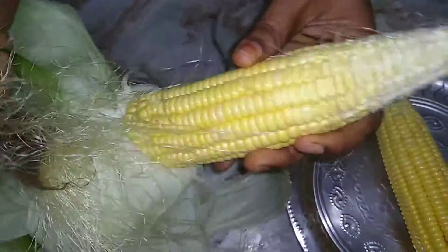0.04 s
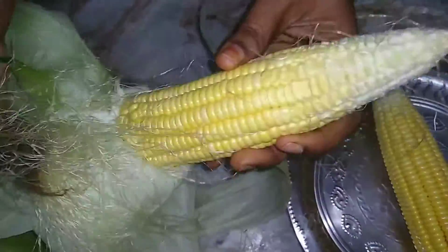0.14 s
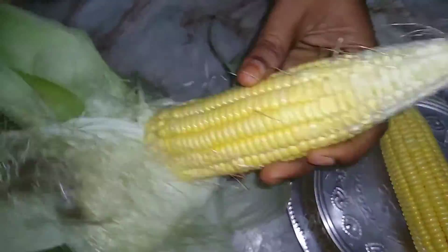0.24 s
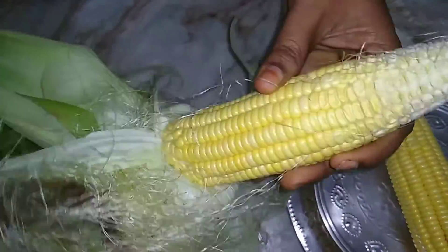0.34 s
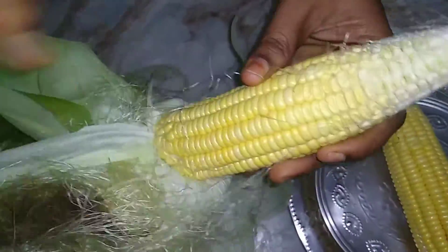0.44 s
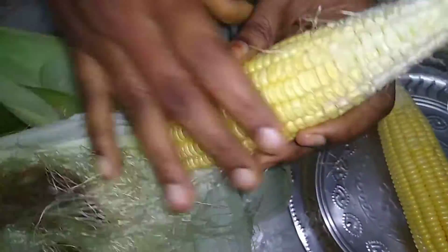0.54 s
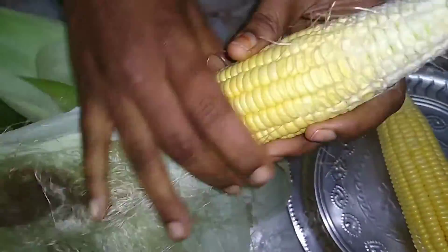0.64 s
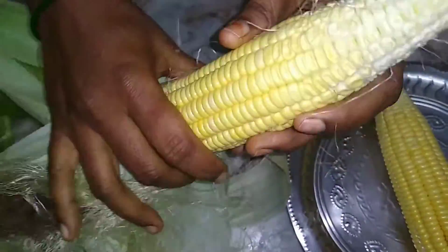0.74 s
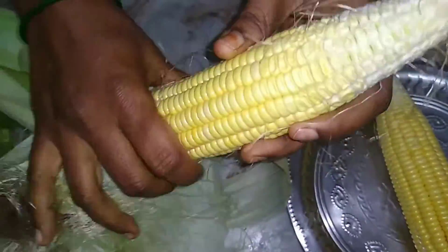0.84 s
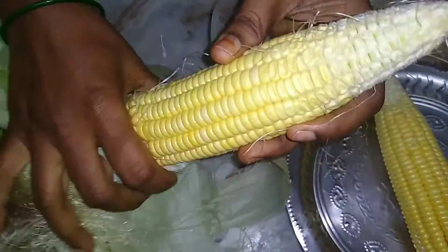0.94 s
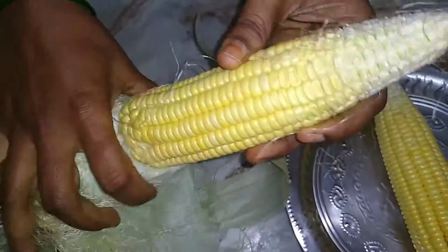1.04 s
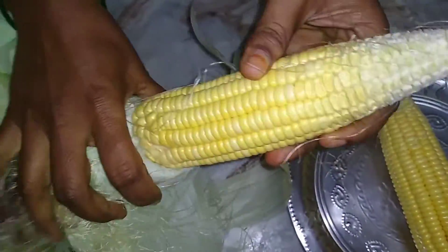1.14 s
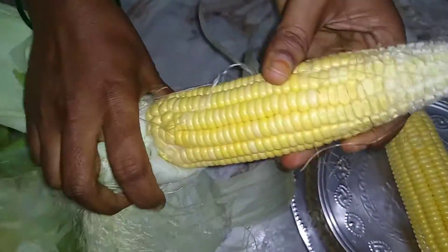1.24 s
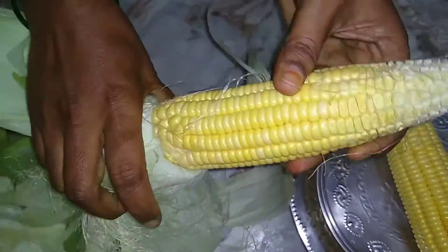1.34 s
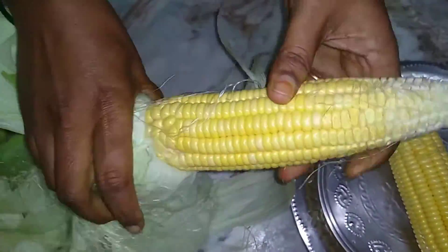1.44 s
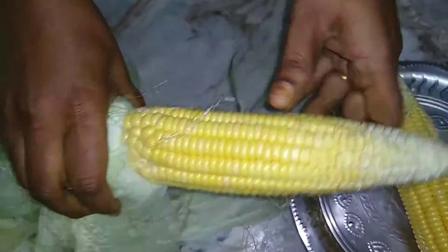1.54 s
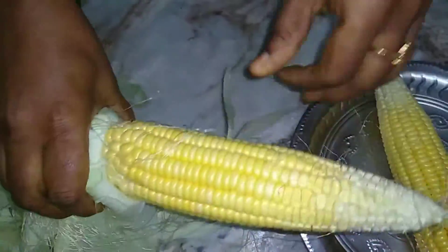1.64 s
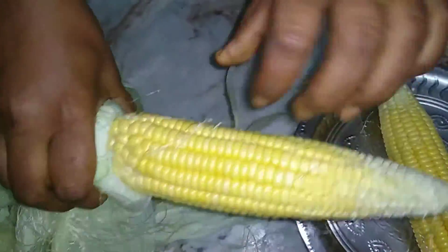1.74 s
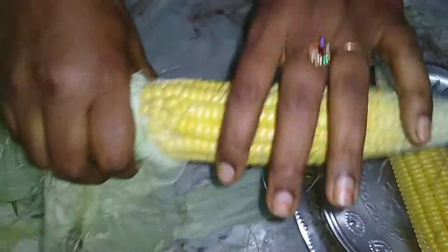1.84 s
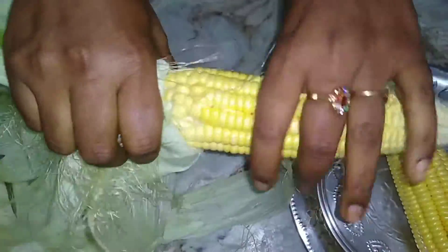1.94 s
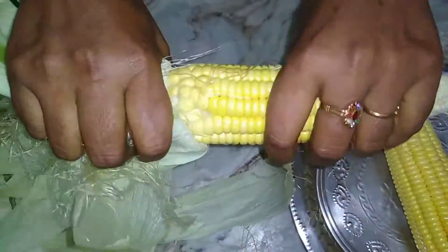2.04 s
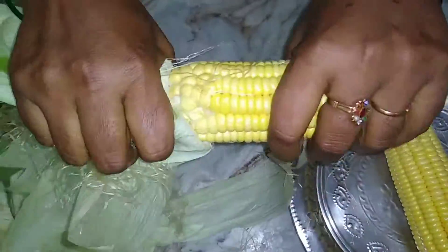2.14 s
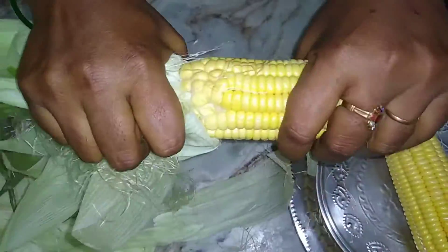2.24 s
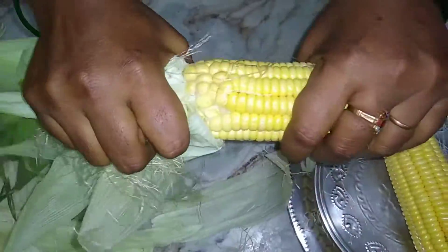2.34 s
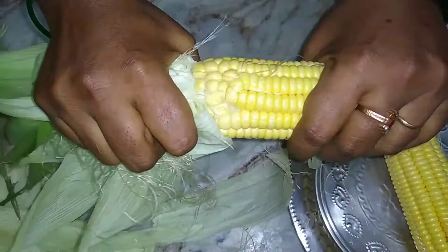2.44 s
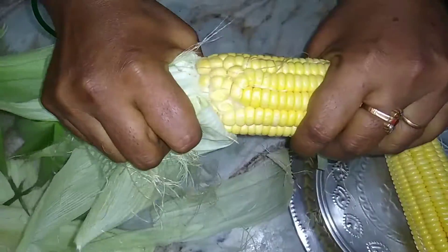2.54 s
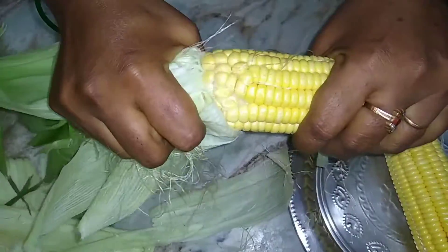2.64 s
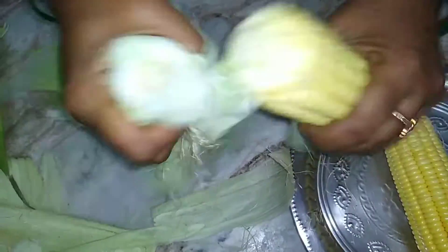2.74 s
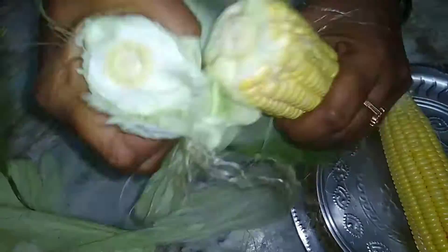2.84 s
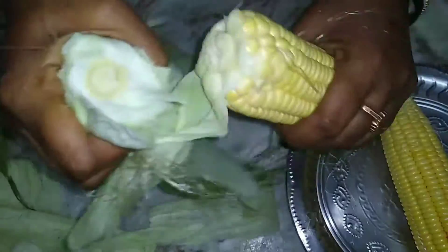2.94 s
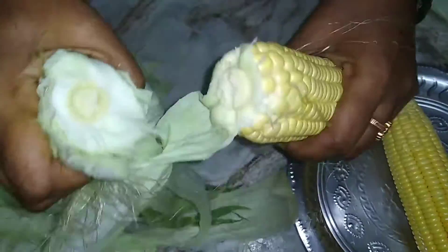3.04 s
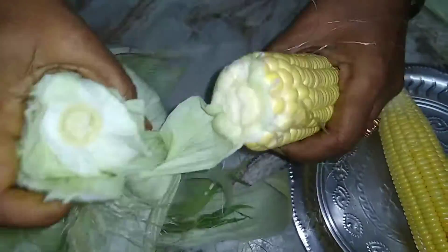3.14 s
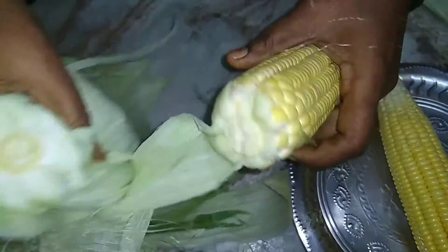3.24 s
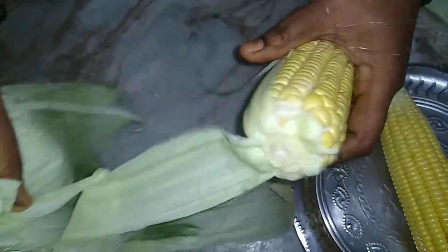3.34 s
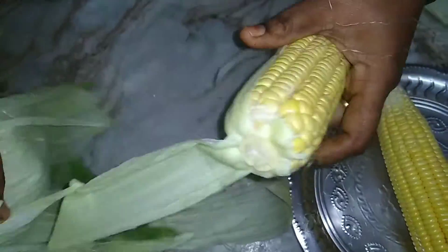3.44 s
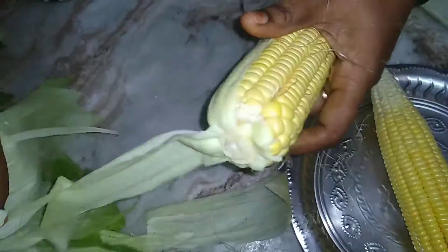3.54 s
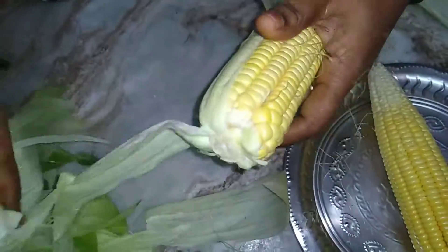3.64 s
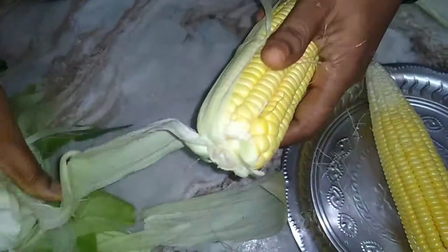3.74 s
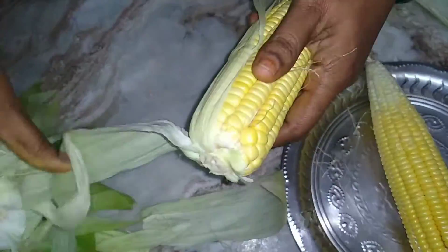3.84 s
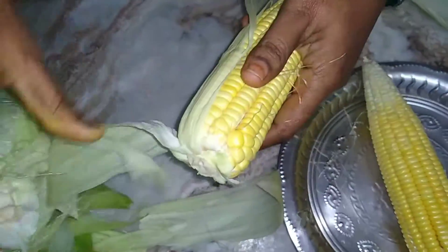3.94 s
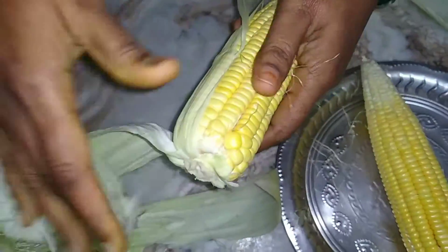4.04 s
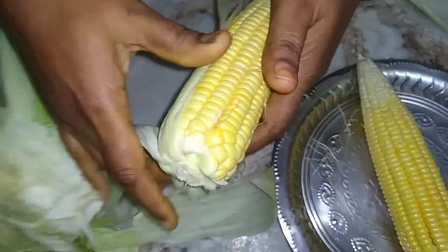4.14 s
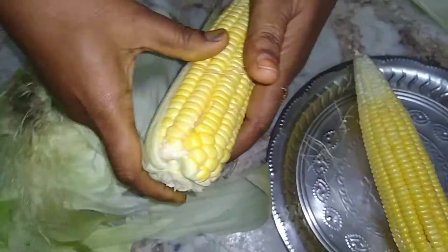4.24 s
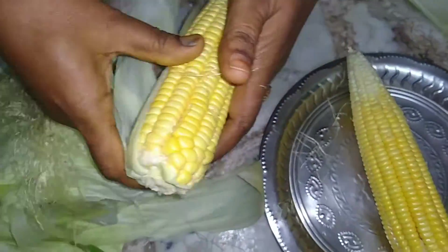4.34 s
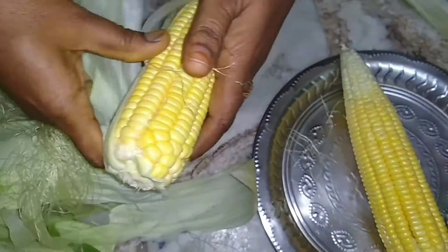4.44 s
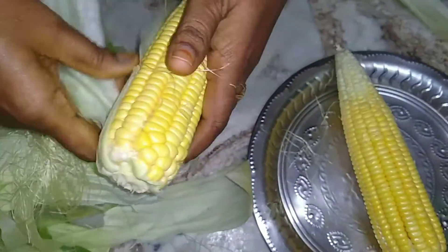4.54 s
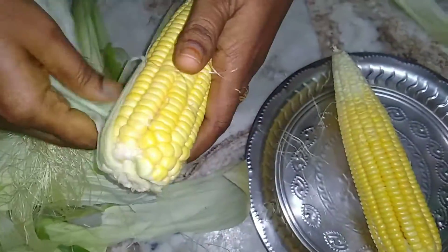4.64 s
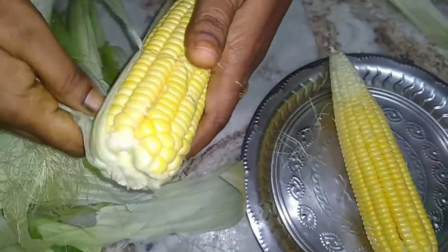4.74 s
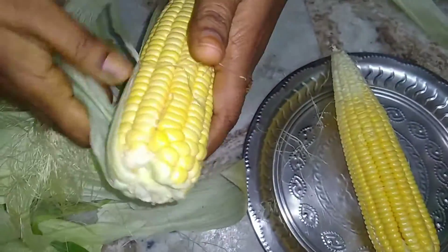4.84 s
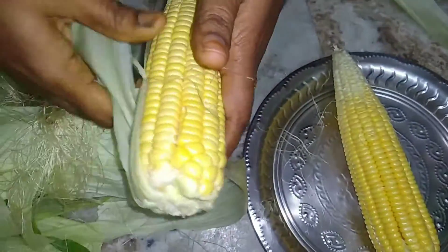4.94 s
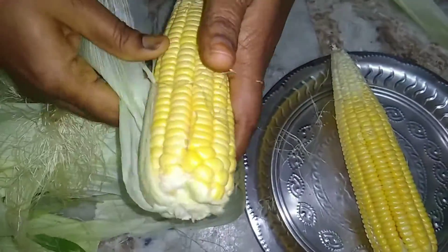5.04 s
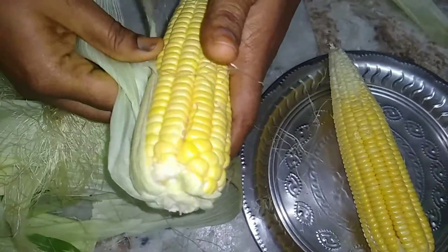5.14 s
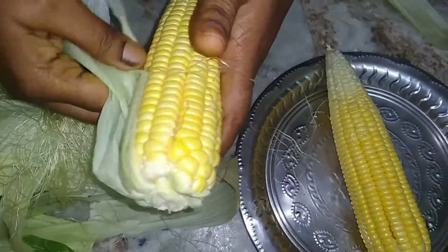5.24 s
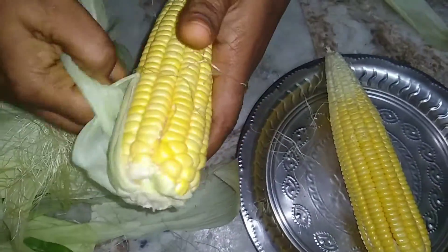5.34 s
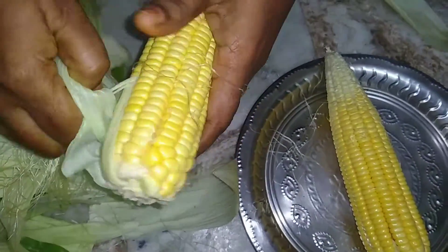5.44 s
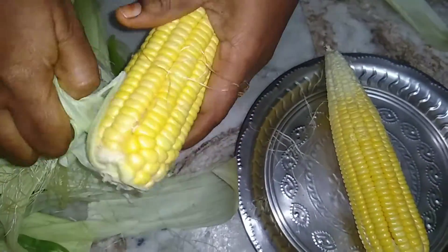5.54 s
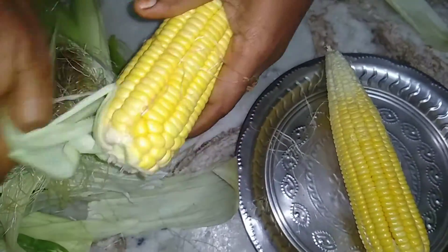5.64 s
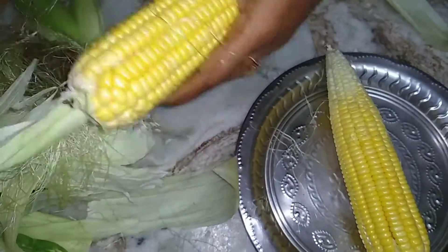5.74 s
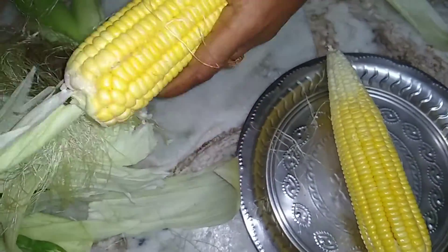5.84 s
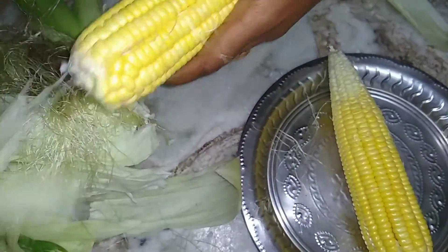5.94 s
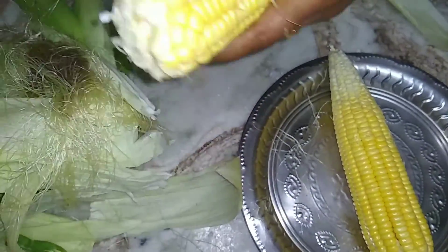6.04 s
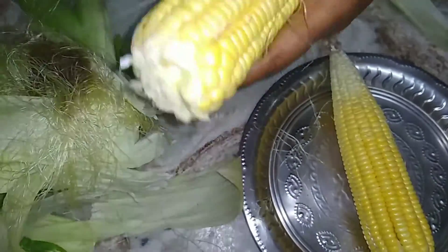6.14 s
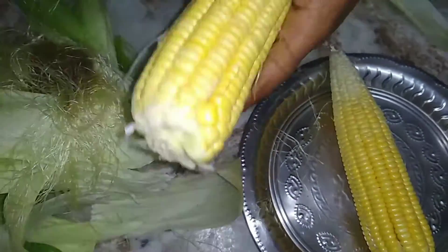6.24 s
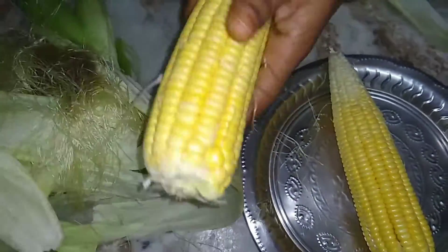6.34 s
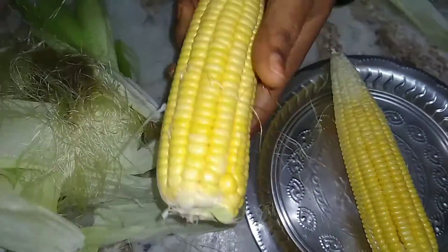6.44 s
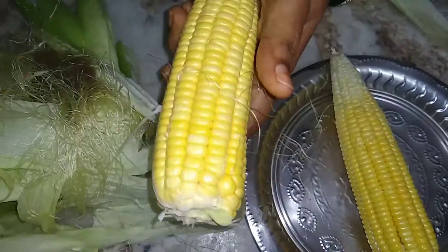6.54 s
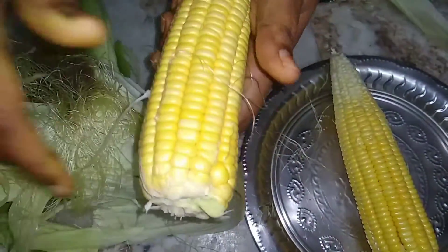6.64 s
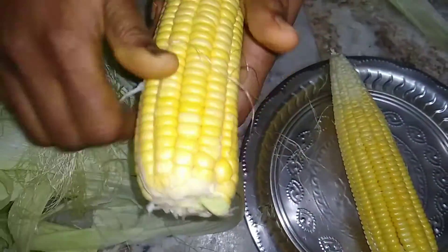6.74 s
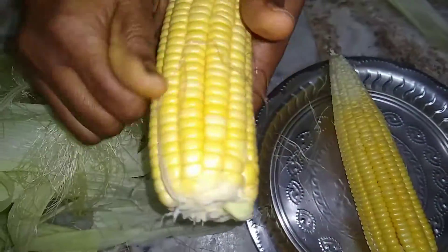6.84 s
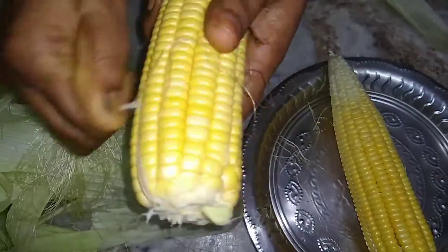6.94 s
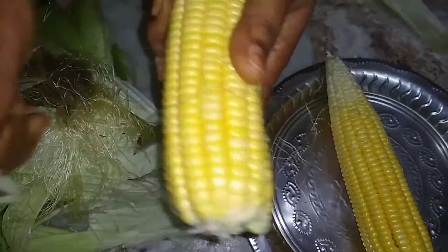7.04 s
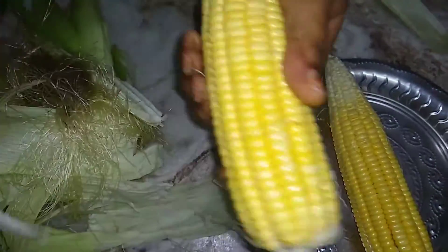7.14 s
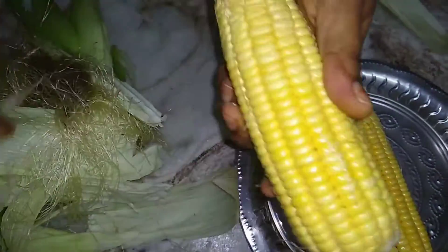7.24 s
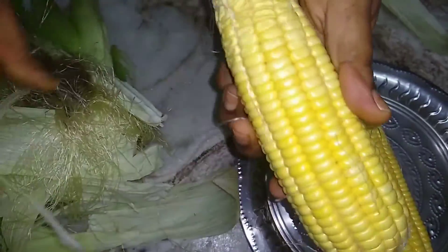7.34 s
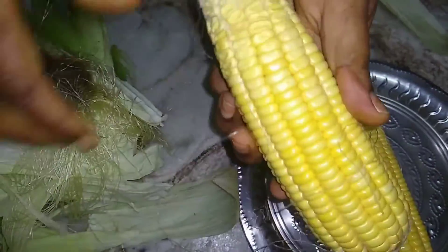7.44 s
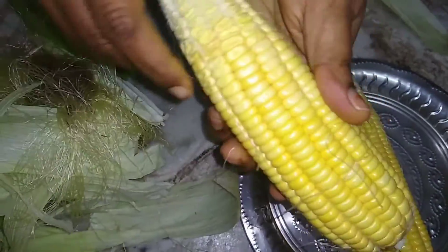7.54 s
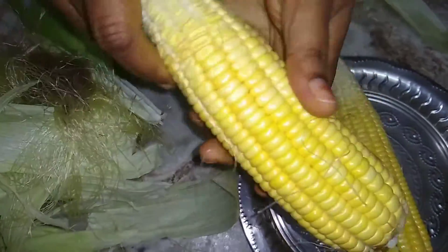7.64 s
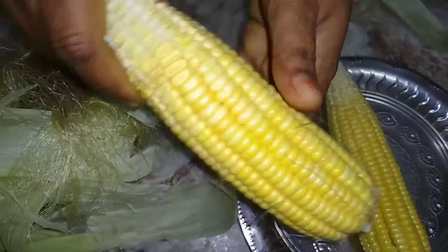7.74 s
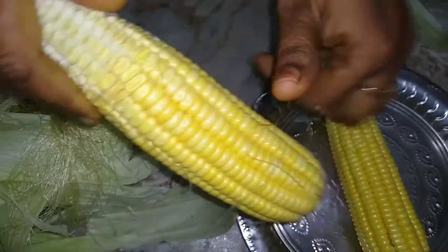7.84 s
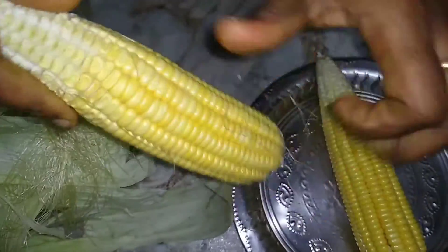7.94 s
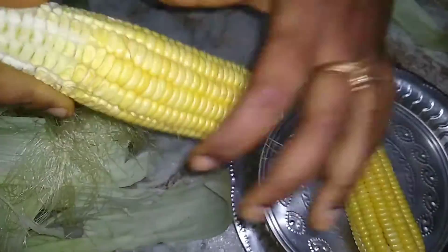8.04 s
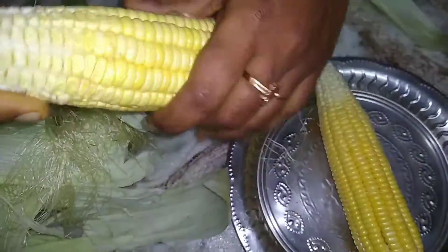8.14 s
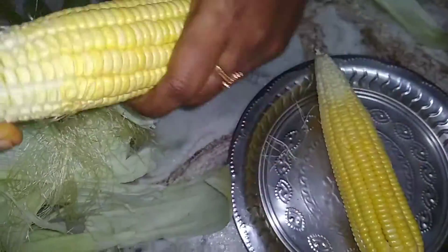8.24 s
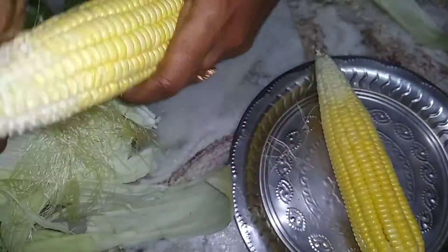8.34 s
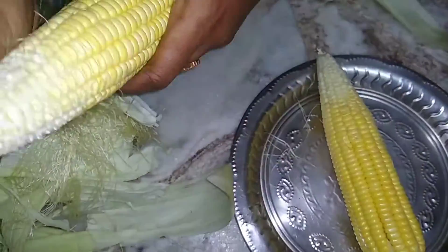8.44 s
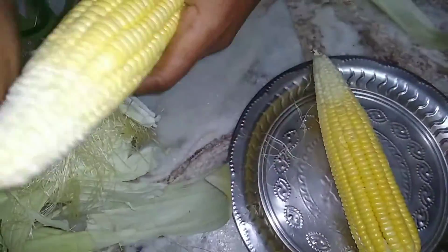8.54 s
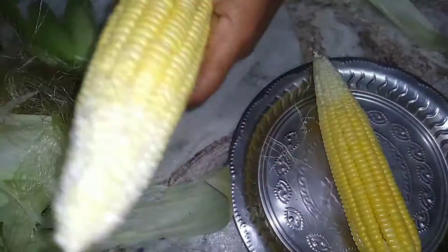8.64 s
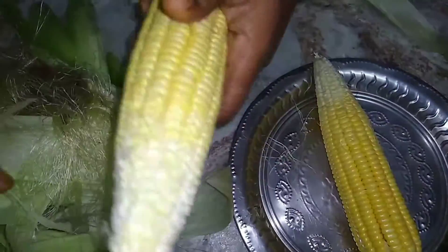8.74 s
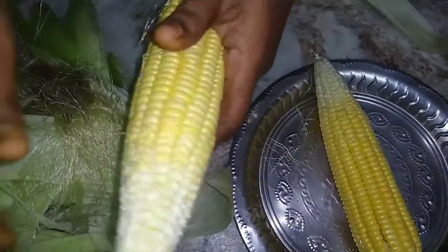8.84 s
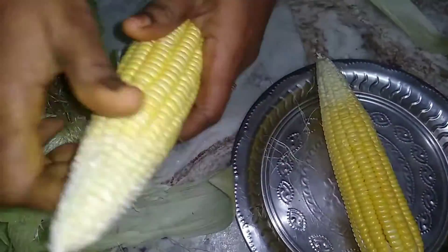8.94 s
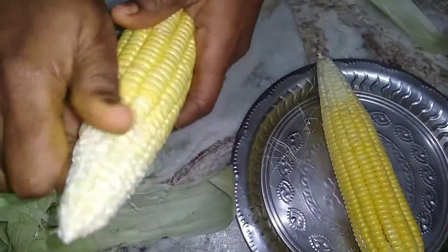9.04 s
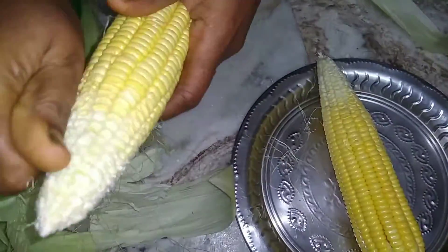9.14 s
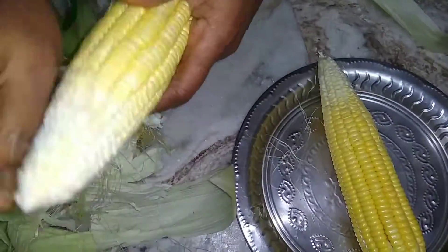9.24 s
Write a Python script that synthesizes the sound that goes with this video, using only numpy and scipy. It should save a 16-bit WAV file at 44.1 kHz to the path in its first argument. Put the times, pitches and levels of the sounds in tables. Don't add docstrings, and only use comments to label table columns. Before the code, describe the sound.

Crisp corn leaves rustle, snap and tear in irregular bursts, fingertips squeak on kernels, and a distant engine idles behind quiet room hush.

```python
import sys
import numpy as np
from scipy import signal
from scipy.fft import rfft, irfft, next_fast_len
from scipy.io import wavfile
from scipy.ndimage import uniform_filter1d

SR = 44100
rng = np.random.default_rng(int(sys.argv[2]) if len(sys.argv) > 2 else 0)


def invert_db(level):
    return 10 ** (np.asarray(level, dtype=float) / 20)


def inscribe(sig):
    pcm = np.round(np.clip(np.atleast_2d(sig).T, -1, 1) * 32767)
    wavfile.write(sys.argv[1], SR, pcm.astype(np.int16))


N = 409248


def in_time(rows):
    s, *columns = np.transpose(rows)
    return [np.interp(np.arange(N) / SR, s, column) for column in columns]


def at_hz(points, hz):
    f, *columns = np.transpose(points)
    return [np.interp(np.log(hz + 1), np.log(f), column) for column in columns]


def rms_one(x):
    return x / np.sqrt(np.mean(x ** 2) + 1e-20)


def band(x, low_hz, high_hz):
    return signal.sosfilt(signal.butter(2, [low_hz, high_hz], "band", fs=SR, output="sos"), x)


def resonance(x, hz, width_hz):
    r = np.exp(-np.pi * width_hz / SR)
    zeros = np.array([1, 0, -1]) * (1 - r * r) / 2
    return signal.lfilter(zeros, [1, -2 * r * np.cos(2 * np.pi * hz / SR), r * r], x)


def drift(rate_hz):
    r = np.exp(-32 * np.pi * rate_hz / SR)
    slow = signal.lfilter([1], [1, -2 * r, r * r], rng.standard_normal(N // 16 + 3002))
    slow = rms_one(slow[3000:])
    return np.interp(np.arange(N) / 16, np.arange(len(slow)), slow)


def ramp_db(t, rise_s, hold_s, fall_s):
    before = np.minimum(t, 0) / max(rise_s, .002)
    after = np.maximum(t - hold_s, 0) / max(fall_s, .004)
    return 30 * (before - after)


def patches(x, depth_db, rate_hz):
    out = x
    for hz in np.geomspace(700, 14500, 11):
        gain = invert_db(depth_db * (drift(rate_hz) - .15))
        out = out + (gain - 1) * resonance(x, hz, .22 * hz)
    return out


# [pitch_hz, density_db per Hz]
HUSH_COLOUR = [(30, -29), (90, -14.5), (160, -7), (320, -14.5), (390, -7), (500, -12.5), (1100, -15),
               (1800, -16.5), (3200, -20), (5300, -25), (7500, -31), (11500, -30.5), (14400, -30)]


def hush():
    colour_db, = at_hz(HUSH_COLOUR, np.fft.rfftfreq(N, 1 / SR))
    noise = irfft(rfft(rng.standard_normal((2, N))) * invert_db(colour_db), N)
    return invert_db(-63 + 1.07 * drift(2.8)) * rms_one(noise)


# [start_s, length_s, start_hz, end_hz, level_db]
FAR_SQUEALS = [
    (.54, .13, 470, 523, -56.5),
    (0.593, 0.23, 565, 574, -58),
    (0.788, 0.12, 730, 700, -60.5),
    (7.53, 0.14, 615, 587, -61),
    (8.175, .14, 720, 736, -64.5),
    (8.633, 0.21, 1320, 1375, -61.5),
    (8.935, .18, 1065, 1081, -64),
]


def squeals():
    out, waver = np.zeros(N), drift(25)
    for s, length_s, start_hz, end_hz, db in FAR_SQUEALS:
        i, n = round(s * SR), round(length_s * SR)
        hz = np.linspace(start_hz, end_hz, n) * (1 + 0.016 * waver[i:i + n])
        tone = np.sin(2 * np.pi * np.cumsum(hz) / SR)
        out[i:i + n] += invert_db(db) * np.sqrt(np.hanning(n)) * tone
    return out


# [time_s, firings_per_s]
ENGINE_SPEED = [(0, 29.9), (.6, 29.2), (1.06, 27.9), (1.83, 29.9), (2.4, 29.2), (2.8, 29.4), (3.54, 31.7),
                (4.03, 32.2), (4.25, 28.8), (4.5, 26), (5.25, 23.1), (5.75, 20.5), (6.3, 24.5), (6.6, 26.9),
                (7.0, 29.4), (7.35, 30.9), (8.4, 32.3), (9.28, 33)]
# [time_s, exhaust_bark_db, low_lugging_db]
ENGINE_EFFORT = [(0, -88, -74), (1.3, -95, -78), (1.75, -95, -62), (2.3, -92, -71), (3.05, -80, -60),
                 (3.33, -68, -57), (3.8, -82, -76), (3.95, -70, -70), (4.25, -63, -68), (4.8, -71, -75),
                 (5.5, -68, -68), (6.1, -75, -76), (6.5, -72, -82), (7.1, -84, -64), (7.52, -70, -66),
                 (7.85, -78, -74), (8.35, -70, -80), (9.28, -76, -76)]
# [order, level_db]
FIRING_ORDERS = [(3, -11), (4, -7), (5, -4), (6, -12), (7, -14), (8, -14), (9, -15), (10, -17), (11, -19),
                 (12, -16), (13, -14)]
# [pitch_hz, width_hz, lift_db]
PIPE_MODES = [(99, 7, 10), (123, 7, 8), (159, 8, 20), (190, 10, 10), (235, 40, 10), (385, 20, 15)]


def engine():
    per_s, = in_time(ENGINE_SPEED)
    bark_db, lug_db = in_time(ENGINE_EFFORT)
    turn = 2 * np.pi * np.cumsum(per_s * (1 + 0.0024 * drift(5.1))) / SR
    gain_per_s2 = uniform_filter1d(np.gradient(per_s) * SR, size=9000)
    load = np.clip(gain_per_s2 / 3.0, -1, 1)
    scale_hz = np.arange(500.)
    pipe_db = sum(top_db / (1 + ((scale_hz - hz) / width_hz) ** 2) for hz, width_hz, top_db in PIPE_MODES)
    out = invert_db(lug_db) * np.sin(2 * turn + 1)
    for order, db in FIRING_ORDERS:
        k = round(order)
        lift_db = np.interp(k * per_s, scale_hz, pipe_db)
        tilt_db = 2.5 * load * np.clip(k - 4.5, -1, 1.5)
        level_db = bark_db + db + lift_db + tilt_db + 2.2 * drift(3)
        out = out + invert_db(level_db) * np.sin(k * turn + rng.uniform(0, 2 * np.pi))
    return np.sqrt(2) * out


# [start_s, rise_s, fall_s, peak_db]
FINGER_SKIDS = [(1.62, .04, .02, -64), (1.645, .006, .04, -60), (1.684, .006, .08, -54),
                (1.705, .008, .05, -56), (1.742, .006, .04, -55), (1.76, .006, .07, -53),
                (1.788, .008, .06, -51), (1.81, .01, .08, -58), (6.334, .006, .04, -64),
                (7.704, .01, .07, -56), (7.73, .01, .06, -59), (7.775, .015, .03, -68)]
# [pitch_hz, width_hz, level_db]
KERNEL_MODES = [(4900, 400, -1), (5500, 400, -3), (9500, 400, 7), (10700, 400, 5), (14700, 350, 8),
                (15300, 400, 8)]


def skids():
    t = np.arange(N) / SR
    shapes = [db + ramp_db(t - s - rise_s, rise_s, 0, fall_s) for s, rise_s, fall_s, db in FINGER_SKIDS]
    level_db = np.max(shapes, axis=0).clip(-150)
    bursts_per_s = 56
    slips = rng.standard_normal(N) * invert_db(level_db + 3.0 * drift(bursts_per_s))
    return invert_db(15) * sum(invert_db(db) * resonance(slips, hz, width_hz) for hz, width_hz, db in KERNEL_MODES)


# [start_s, length_s, start_hz, end_hz, level_db]
LEAF_WHISTLES = [
    (.918, .05, 14600, 14900, -41),
    (.918, .03, 9600, 9600, -52),
    (2.018, .04, 15000, 15000, -54),
    (5.795, .04, 9600, 9600, -52),
    (5.838, .07, 14000, 15400, -44),
    (5.838, .04, 10800, 11000, -46),
    (5.945, .04, 9800, 9800, -44),
    (2.746, .05, 7800, 7800, -34),
]


def whistles():
    out, width_hz = np.zeros(N), 900
    grain = signal.lfilter([1], [1, -np.exp(-np.pi * width_hz / SR)], rng.standard_normal(N))
    for s, length_s, start_hz, end_hz, db in LEAF_WHISTLES:
        i, n = round(s * SR), round(length_s * SR)
        attack = np.minimum(np.arange(n) / (.003 * SR), 1)
        fade = invert_db(db - 22.0 * np.arange(n) / n) * attack
        glide = np.sin(2 * np.pi * np.cumsum(np.linspace(start_hz, end_hz, n)) / SR)
        out[i:i + n] += fade * rms_one(grain[i:i + n]) * glide
    return out


# [time_s, leaf_db]
RESTLESS_HANDS = [(0, -66), (1.4, -62), (2.3, -63), (2.7, -64), (3.2, -58), (3.8, -61), (4.8, -62),
                  (5.25, -67), (5.6, -59), (6.2, -70), (7.4, -76), (9.28, -73)]
# [time_s, leaf_db, body_share_db, fibre_share_db, fade_30db_s]
HUSK_GRIPS = [(0.0, -30, 8, 2, .095), (.716, -54, 4, -2, .2), (.923, -43, 3, 8, .1), (1.097, -43, 8, 4, .1),
              (1.226, -36, -6, -5, .035), (2.02, -43, 8, 6, .09), (2.157, -60, -2, -2, .3),
              (2.551, -35, -10, -11, .02), (2.617, -45, 11, -3, .075), (2.748, -18, -4, -2, .08),
              (2.786, -30, 3, -1, .3), (2.925, -34, -6, -1, .075), (3.245, -39, 2, -12, .1),
              (3.546, -39, -3, -2, .28), (5.8, -50, -6, 8, .08), (5.84, -47, 0.1, 14, .08),
              (5.95, -34, -3, 5, .07), (6.338, -56, 0, 3, .07), (7.708, -62, 6, 12, .12),
              (8.344, -59, -3, 4, .25), (9.085, -58, -3, 2, .15)]
# [start_s, length_s, leaf_db, body_share_db, fibre_share_db]
HUSK_PULLS = [(.195, .17, -46, -9, -4), (.62, .1, -61, 0, -16), (1.0, .09, -60, 1, -13),
              (1.23, .09, -51, -6, -4), (1.62, .24, -62, 2, 9), (2.57, .045, -55, 9, 4),
              (3.01, .07, -50, -5, -4), (3.122, .05, -54, -9, -5), (3.255, .15, -30, -4, -12),
              (3.29, .09, -29, -10, -4), (3.38, .07, -47, 0, 0.1), (3.68, .1, -50, -3, -6),
              (4.2, .048, -42, -9, -8), (4.23, .09, -57, 0.1, -12), (5.444, .027, -43, 8, 6),
              (5.478, .036, -46, 2, -2), (5.582, .12, -45, 2, 4), (5.67, .175, -46, -7, 4),
              (5.685, .075, -37, -10, -2), (5.96, .085, -52, 0, 3), (6.6, .035, -65, -12, 0),
              (6.93, .18, -59, -4, 2)]


def rustle():
    power = invert_db(2 * (in_time(RESTLESS_HANDS)[0] + np.array([[1.5], [0], [-14]])))
    t = np.arange(N) / SR
    fade_speed = np.array([[1.0], [1], [1.15]])
    attack_s = .007
    strokes = [(s - attack_s, attack_s, 0, fade_s, *db) for s, *db, fade_s in HUSK_GRIPS]
    rise, fall = .17, .15
    strokes += [(s, rise * d, (1 - rise - fall) * d, fall * d, *db) for s, d, *db in HUSK_PULLS]
    for s, rise_s, hold_s, fall_s, db, body_db, fibre_db in strokes:
        end_s = s + rise_s + hold_s + 2 * fall_s
        near = slice(max(round((s - rise_s) * SR), 0), round(end_s * SR))
        shape_db = ramp_db(t[near] - s - rise_s, rise_s, hold_s, fall_s)
        share_db = np.array([[body_db], [0], [fibre_db]])
        power[:, near] += invert_db(2 * (db + share_db + fade_speed * shape_db))
    return 10 * np.log10(power)


def crackle(per_s, spread_db, clump_db):
    sizes = invert_db(spread_db * np.minimum(rng.exponential(1, N), 5)) * rng.choice([-1, 1], N)
    ticks = rms_one(sizes * (rng.random(N) < per_s / SR))
    friction = 0.589 * rng.standard_normal(N)
    return rms_one((ticks + friction) * invert_db(clump_db * drift(60)))


POP_BODY_DB = -24
# [time_s, peak_db, ring_hz, body_share_db, fibre_share_db]
RIB_CRACKS = [(0.7148, -36, 1610, -6, -25), (0.7281, -34, 1660, 5.5, -4.5), (0.7484, -29, 1660, 5.5, -4.5),
              (0.9208, -29.5, 840, -10, 7.5), (1.0955, -26, 980, -5, -6), (1.1013, -23, 1450, -3, 0.1),
              (1.2243, -27, 1500, -10, -6), (1.6221, -32, 1230, -7, -11), (2.0191, -22, 1360, -11, -20),
              (2.0424, -23.5, 1230, -26, -8), (2.156, -33, 1110, -26, -22), (2.614, -6.5, 1600, -6, -8.5),
              (2.7464, 1.5, 1274, -8, -5.5), (3.2152, -35.5, 1060, 8.5, -8), (3.2435, -24, 1690, -16, -13),
              (3.2688, -19.5, 1340, 3, -29), (5.6102, -30, 1330, -11, -3), (5.9045, -25, 760, -18, 3),
              (6.9529, -40, 1053, -2, 2.5), (7.0351, -35.5, 1720, -4.5, 3), (7.0693, -34, 1210, -2, 9.5),
              (7.7137, -48, 1190, -7.5, 3), (8.54, -38, 1178, -25.5, 2)]
# [time_s, peak_db, ring_hz, fibre_share_db]
FIBRE_SNAPS = [(1.7634, -44, 5700, -1), (1.7937, -37, 5660, -5), (2.1907, -36, 3200, -14),
               (2.4279, -39, 3300, 5), (2.5299, -41, 3110, -2), (2.5492, -25.5, 3300, 0),
               (2.5682, -32, 3340, 7), (2.586, -24, 3440, -1), (2.9337, -28.5, 3060, 2),
               (3.24, -29, 3970, -13.5), (3.5134, -33, 2970, -2), (5.3858, -36.5, 3290, -7),
               (5.9745, -20.5, 3380, -1), (6.9145, -40.5, 3040, 0), (6.9947, -36, 2580, 0),
               (8.3387, -41.5, 3280, 8), (8.3815, -37, 3210, 7.5)]
# [time_s, peak_db, ring_hz, t60_s]
LEAF_POPS = [(0.2124, -41, 3600, .022), (3.3263, -30.5, 3500, .025), (3.5438, -18, 3840, .026),
             (3.5495, -13, 4100, .012), (3.5575, -18, 3300, .012), (3.565, -15, 3700, .012),
             (4.2162, -31.5, 2940, .03), (5.4497, -23, 5100, .05), (5.4841, -26, 5100, .045),
             (5.5413, -27, 4680, .018), (5.692, -14, 3380, .028), (5.7195, -6, 3500, .026),
             (5.7497, -8, 3300, .015), (5.6965, -14, 3500, .03), (5.731, -16, 3300, .012),
             (5.78, -26, 3600, .012), (5.458, -26, 5000, .02), (5.84, -25, 3740, .025),
             (5.8629, -23.5, 3200, .024), (5.9493, -7, 3650, .0083), (8.3629, -34, 3470, .031)]
# [time_s, peak_db]
SILK_FLICKS = [(.7435, -42), (1.592, -52), (2.278, -52), (2.319, -52), (5.172, -54), (5.332, -54),
               (5.355, -58), (5.413, -50), (5.712, -36), (5.7978, -42), (9.1, -46)]
# [time_s, peak_db]
FIBRE_TICKS = [(1.2406, -48), (1.4944, -52), (1.562, -46), (2.0274, -38), (2.1744, -36.5), (2.303, -46),
               (2.3194, -49), (2.505, -47), (2.5964, -30), (2.6074, -24), (2.7664, -31), (2.8044, -22),
               (2.8313, -31), (3.2804, -26), (3.328, -17), (3.5799, -24), (5.589, -38), (5.635, -32),
               (5.726, -14), (1.631, -42), (3.0237, -42), (3.306, -28), (6.2272, -50), (7.7902, -48),
               (8.0094, -52.5), (9.0836, -42), (9.1, -36.5), (9.1377, -46)]


def breaks():
    rows = RIB_CRACKS + [(s, db, hz, -8, fibre_db) for s, db, hz, fibre_db in FIBRE_SNAPS]
    rows = [(*row, .034 - .00065 * (row[1] + 35)) for row in rows]
    rows += [(s, db, hz, POP_BODY_DB, -21, t60_s) for s, db, hz, t60_s in LEAF_POPS]
    rows += [(s, db, 6000, -20, 8, .008) for s, db in SILK_FLICKS]
    return rows + [(s, db, 3400, -14, -3, .009) for s, db in FIBRE_TICKS]


def snapping():
    force, rings = np.zeros((3, N)), np.zeros(N)
    fray = crackle(per_s=6000, spread_db=-1.0, clump_db=2.1)
    t = np.arange(int(.12 * SR)) / SR
    for s, db, hz, body_db, fibre_db, t60_s in breaks():
        i = round(s * SR)
        n = min(len(t), N - i)
        burst = invert_db(db - 11.5 - 60 * t[:n] / max(t60_s, .004)) * fray[i:i + n]
        burst[0] += invert_db(db + 1.5)
        force[:, i:i + n] += invert_db(np.array([[body_db], [0], [fibre_db]])) * burst
        if 4500 < hz < 5900:
            rings[i:i + n] += invert_db(17) * resonance(resonance(burst, hz, 900), hz, 900)
        elif body_db == POP_BODY_DB:
            rings[i:i + n] += invert_db(6) * resonance(resonance(burst, hz, 800), hz, 800)
        ring = invert_db(db - 8 - 60 * t / 0.013) * np.sin(2 * np.pi * hz * t)
        rings[i:i + n] += ring[:n]
    return force, rings


def husk(rustle_db):
    grains = crackle(per_s=4000, spread_db=3.5, clump_db=1.7)
    snaps, rings = snapping()
    force = grains * invert_db(rustle_db - 4.0) + snaps
    out = 0
    for push, sign, (low_hz, high_hz) in zip(force, (1, -1, 1), [(450, 2330), (2100, 5100), (7000, 20000)]):
        out = out + sign * band(push, low_hz, high_hz) / np.std(band(grains, low_hz, high_hz))
    cob = invert_db(-4.0) * band(force[0], 170, 410)
    return rings + patches(out, depth_db=2.2, rate_hz=12.0) - cob


def room(x, t60_s, level_db):
    t = np.arange(int(.4 * SR)) / SR
    tail = band(rng.standard_normal(len(t)), 200, 7000) * invert_db(-60 * t / t60_s) * (t > .004)
    return x + invert_db(level_db) * signal.fftconvolve(x, tail / np.linalg.norm(tail))[:N]


def scatter(x):
    paths = rng.standard_normal((5, 500)) * invert_db(-60 * np.arange(500) / SR / 0.0081)
    return sum(signal.oaconvolve(x * drift(25), path / np.linalg.norm(paths))[:N] for path in paths)


# [pitch_hz, level_db, phase_rad, direct_share 0-1]
PORT_DIFFERENCE = [(56.7, -24, 0.1, .6), (300, -12.5, 0.1, .6), (700, -5, .55, 0.4), (1600, 2, 1.5, 0),
                   (2576, 1.5, 3, 0.8), (4500, 1.95, 3.5, 0.33), (6300, 0.5, 4, 0.2),
                   (8500, -0.2, -2.1, 0.44), (12000, .1, 0.8, .4), (14500, 3.5, -2.4, .6)]


def ports(x, scattered):
    size = next_fast_len(N + 4096)
    db, phase, direct = at_hz(PORT_DIFFERENCE, np.fft.rfftfreq(size, 1 / SR))
    direct = np.clip(direct, 0, 1)
    difference = rfft(x, size) * direct * np.exp(1j * phase)
    difference = difference + np.sqrt(1 - direct ** 2) * rfft(scattered, size)
    difference = irfft(invert_db(db) * difference, size)[:N]
    return np.array([x + difference, x - difference])


def scene():
    rustle_db = rustle()
    opening_db = np.clip(.6 * (rustle_db[2] + 74), 0, 8.0)
    front, around = hush() * invert_db(opening_db)
    front = patches(front, depth_db=2.5, rate_hz=7.0)
    hands = room(husk(rustle_db) + skids() + whistles(), t60_s=0.13, level_db=-15.5)
    street = (engine() + squeals()) * invert_db(0.77 * opening_db - 2.0)
    return ports(hands + street + front, scatter(hands) + street + around)


# [pitch_hz, level_db against the neighbours]
MUTE_DEPTH = [(700, -19), (2200, -16), (4500, -13), (9000, -9.5), (15000, -8)]


def mute_weak_bands(x):
    cells = signal.stft(np.array([x[0] + x[1], x[0] - x[1]]) / 2, nperseg=2048)[2]
    power = (np.abs(cells[:, :1020]) ** 2).reshape(2, 102, 10, -1).sum(axis=2)
    around = uniform_filter1d(power.mean(axis=0), size=11, axis=0)
    below_db, = at_hz(MUTE_DEPTH, (np.arange(102)[:, None] + .5) * 10 * SR / 2048)
    waver = uniform_filter1d(rng.standard_normal(power.shape), size=3, axis=2) * np.sqrt(3)
    strong = power > around * invert_db(2 * (below_db + 2.5 * waver))
    total = power[:, 8:].sum(axis=(0, 1))
    sudden = total > 6 * np.roll(total, 1)
    kept = strong | sudden
    kept[:, :6] = True
    cells[:, :1020] *= np.repeat(kept, 10, axis=1)
    mid, side = signal.istft(cells, nperseg=2048)[1][:, :N]
    return np.array([mid + side, mid - side])


def low_pass(x):
    return signal.sosfilt(signal.butter(12, 16390, fs=SR, output="sos"), x)


def record(dry):
    size = next_fast_len(N + 4096)
    hz = np.fft.rfftfreq(size, 1 / SR)
    delay_s = 20 / 44100
    cross = .96 / (1 + (hz / 7500) ** 2) * np.exp(-2j * np.pi * hz * delay_s)
    lift = 0.7 * (1j * hz + 550) / (1j * hz + 45)
    top = invert_db(-np.clip(hz - 15480, 0, None) * .055)
    left, right = rfft(dry, size)
    wide = np.array([left - cross * right, right - cross * left])
    wide = irfft(wide * lift * top, size)[:, :N]
    wide = signal.sosfilt(signal.butter(2, 42, "high", fs=SR, output="sos"), wide)
    mix = np.clip(mute_weak_bands(wide), -1, 1)
    return low_pass(mix)


dry = scene()
out = record(dry)
inscribe(out)
```